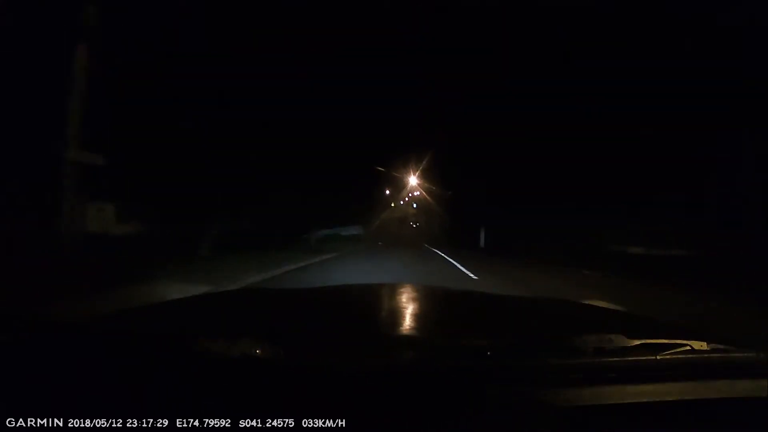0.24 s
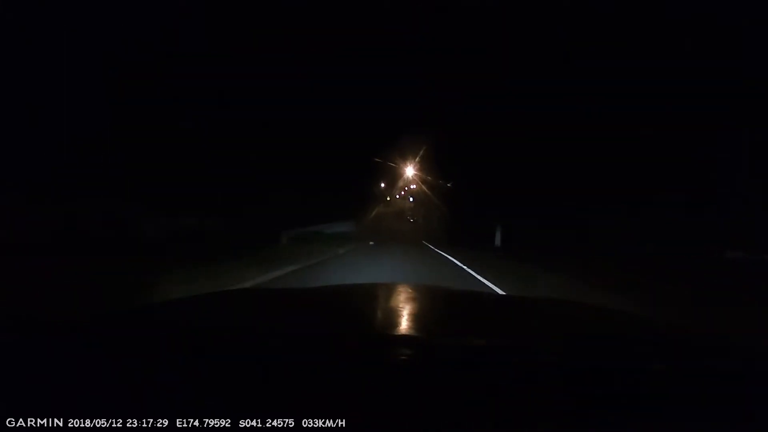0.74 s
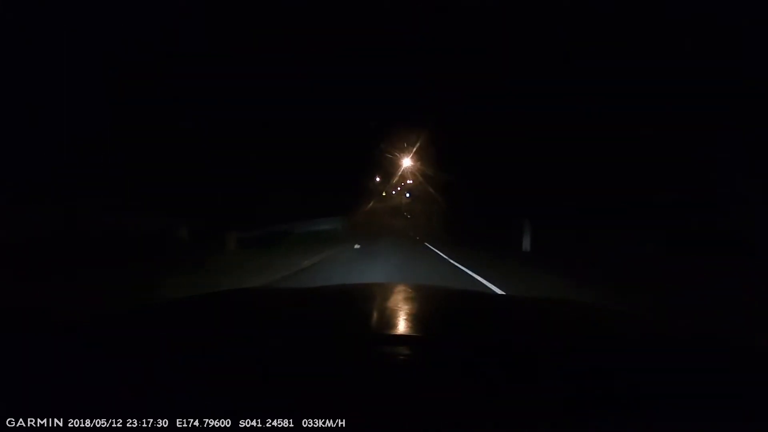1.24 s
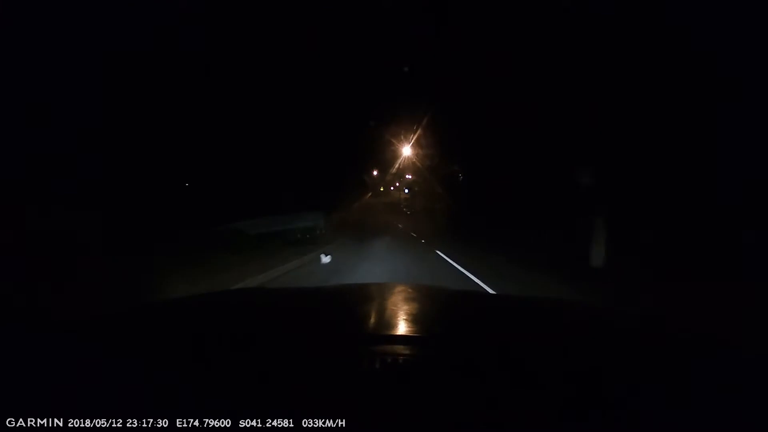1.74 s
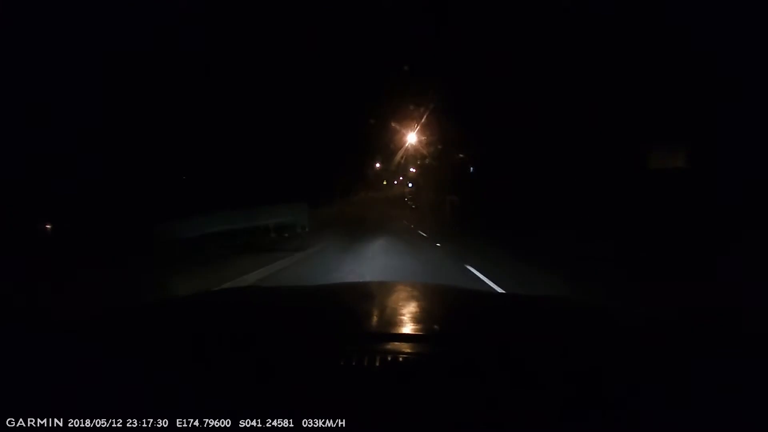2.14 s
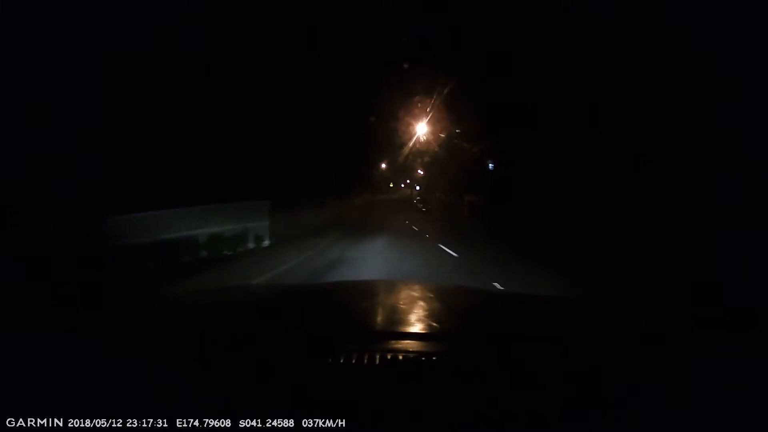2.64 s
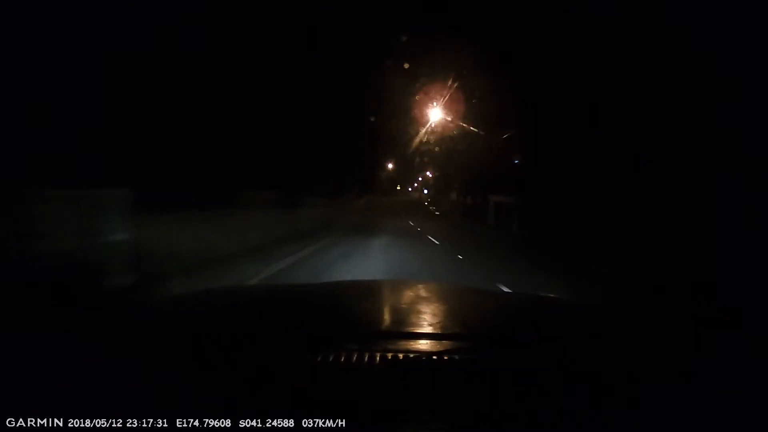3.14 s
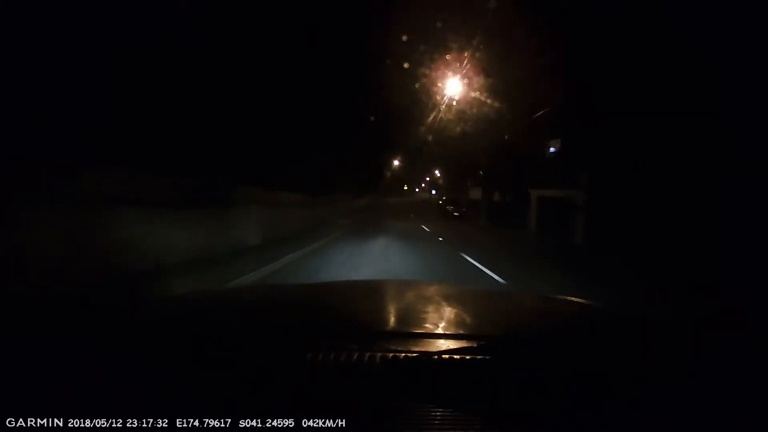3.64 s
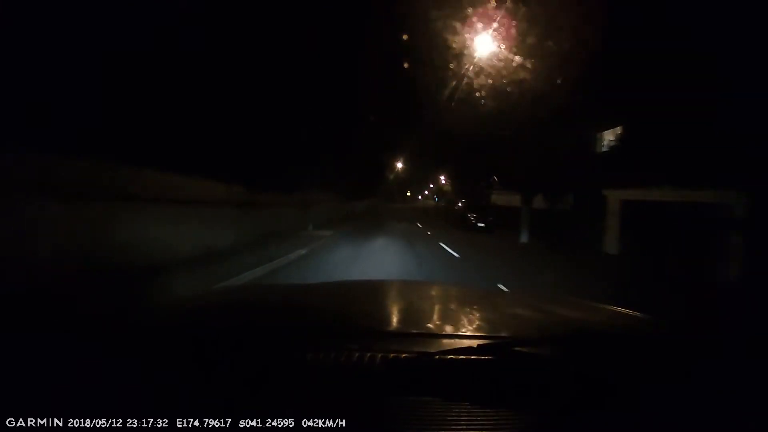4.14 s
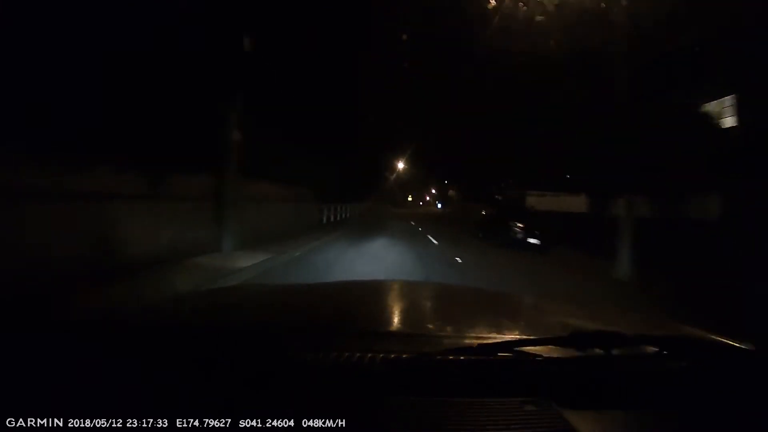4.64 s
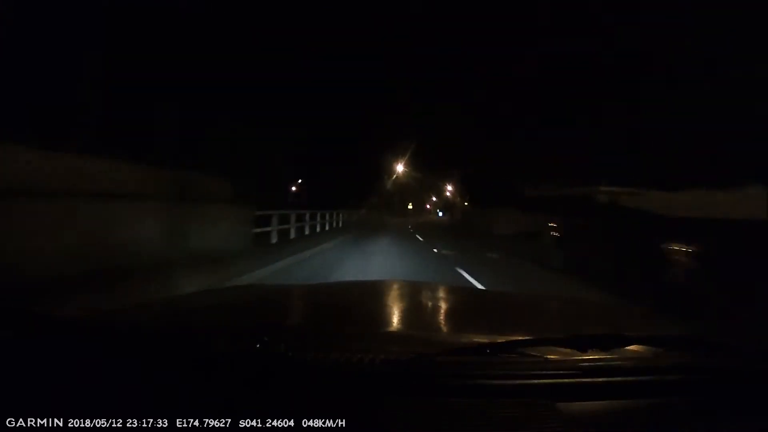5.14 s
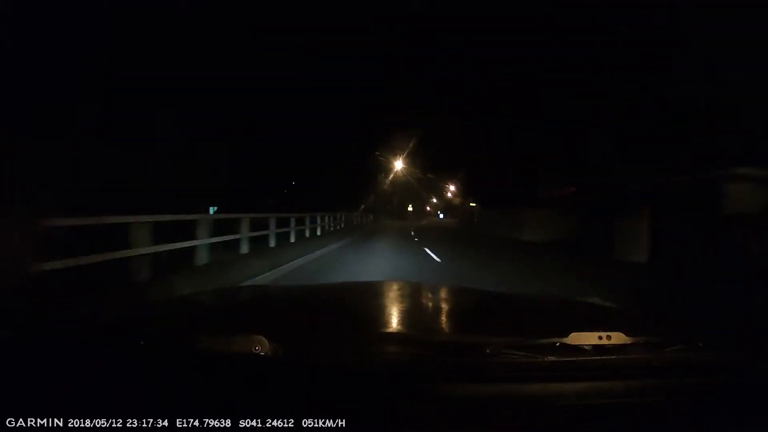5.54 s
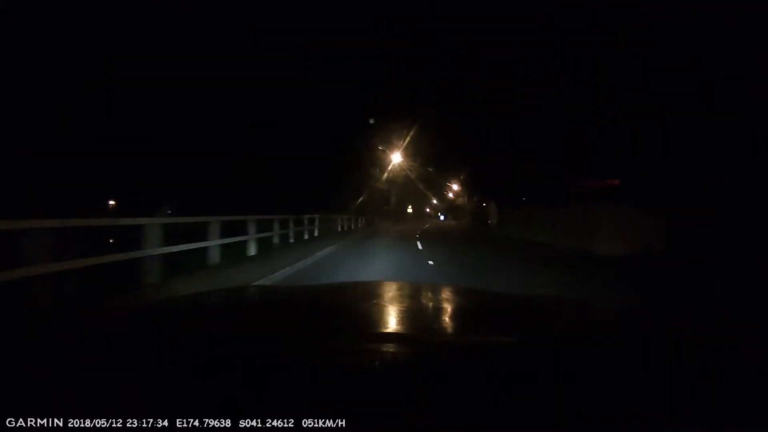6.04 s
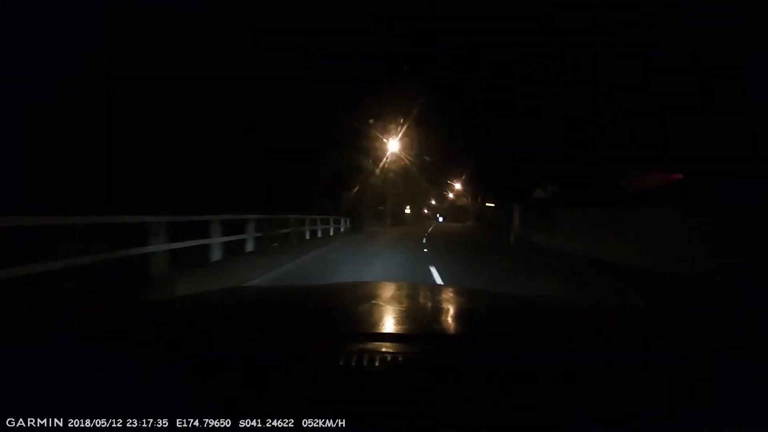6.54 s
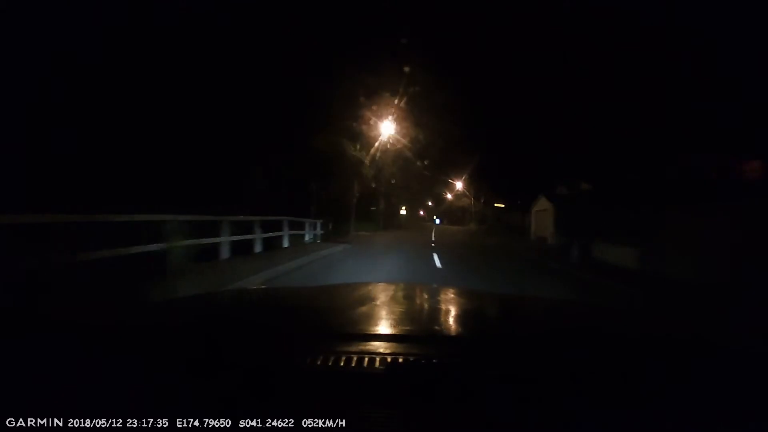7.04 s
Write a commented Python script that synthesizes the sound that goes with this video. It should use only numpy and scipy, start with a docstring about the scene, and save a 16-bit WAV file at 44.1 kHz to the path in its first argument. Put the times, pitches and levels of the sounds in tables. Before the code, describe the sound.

A car drives along a street, heard from the cabin: low booming rumble, humming engine, and occasional bumps, knocks and small plastic clicks.

```python
"""Inside a car at town speed: it pulls gently for four seconds, then the throttle eases and revs sink.
The road shakes the body and cabin air into a deep boom, tyres roar, the engine hums and its valves
tick faintly. Bumps thump, the suspension knocks, loose trim clicks, and air rushes past as speed builds.
A small windscreen microphone adds hiss and flattens the biggest swings."""
import sys
import numpy as np
from scipy import signal
from scipy.fft import rfft, irfft, next_fast_len
from scipy.io import wavfile
from scipy.ndimage import uniform_filter1d

SR = 44100
rng = np.random.default_rng(int(sys.argv[2]) if len(sys.argv) > 2 else 0)


def wav_record(signal):
    """Record a signal, one row per channel, as 16-bit PCM in the file named by sys.argv[1]."""
    frames = np.transpose(np.atleast_2d(signal))
    bounded = np.clip(frames, -1, 1)
    # unit amplitude maps onto the largest positive 16-bit level
    quanta = np.round(bounded * 32767).astype(np.int16)
    wavfile.write(sys.argv[1], SR, quanta)


N = 321489
TIME = np.arange(N) / SR

# unevenness of the road: t/s, relative boom level/dB
UNEVENNESS = [(0.05, -23), (0.25, -27.5), (0.42, -26.5), (0.53, -20), (0.61, -32.5), (.74, -21),
              (1.0, -21.5), (1.35, -24), (1.6, -26), (1.85, -22.5), (2.2, -14.5), (2.45, -20), (2.85, -16),
              (3.15, -19.5), (3.6, -17.5), (4.1, -14), (4.4, -19), (4.9, -16), (5.45, -20), (5.64, -19.5),
              (5.74, -24), (5.83, -21), (6.0, -20.5), (6.2, -18.5), (6.42, -18.5), (6.7, -14),
              (6.98, -19.5), (7.29, -19.5)]
# bumps in the road: crest t/s, relative surge level/dB, half length/s
ROAD_BUMPS = [(0.681, -11, 0.019), (0.834, -16.5, .03), (0.958, -13.5, 0.026), (1.671, -16, 0.03),
              (1.77, -21, 0.018), (2.091, -0.5, 0.026), (2.292, -13.5, 0.054), (2.51, -15, 0.034),
              (2.707, -15, 0.039), (3.279, 0.5, 0.025), (3.802, -4, 0.037), (3.964, -8.5, 0.034),
              (4.211, -7, 0.024), (4.522, -11, 0.033), (4.673, -14, 0.06), (5.07, -6, 0.041),
              (5.235, -8, 0.023), (5.642, -12.5, 0.025), (6.676, -9, 0.056), (6.821, -7, 0.054),
              (7.036, -4, 0.0075), (7.157, -7.5, 0.032)]
# deep modes of suspension, body and cabin air: f/Hz, width/Hz, gain/dB
DEEP_MODES = [(21.64, 10.5, -5.5), (32.1, 16.4, -11.5), (45.55, 13.1, 0.5), (66.1, 26.3, -14)]
def boom(gain_db=2.5, throb_db=1.8, swing_limit=.61):
    """The road shakes the car's deep modes; they throb as the wheels bounce and surge at each bump."""
    road_db, = curves(UNEVENNESS)
    rumble = steady(shaken(DEEP_MODES), span_s=0.1177)
    bed_power = undb(road_db + throb_db * walk(rate=24)) ** 2
    bump_power = sum((undb(db) * swell(s, half_s)) ** 2 for s, db, half_s in ROAD_BUMPS)
    low_end = rumble * undb(gain_db) * np.sqrt(bed_power + bump_power)
    # a soft limit holds back the boom's loudest swells
    swing = abs(signal.hilbert(low_end, next_fast_len(N))[:N])
    return low_end / (1 + (swing / swing_limit) ** 8) ** (1 / 8)


# coarse patches of asphalt: centre t/s, half length/s, boost/dB
COARSE_PATCHES = [(2.08, 0.068, 4), (2.405, 0.1, 3.5), (3.043, 0.21, 3), (3.537, 0.13, 8.5),
                  (3.96, 0.16, 9.5), (4.226, 0.092, 5.5), (7.05, 0.22, 1.5)]
# higher modes of the cabin air: f/Hz, width/Hz, gain/dB
CABIN_MODES = [(106, 40, -3.5), (130.8, 24, 2.5), (191.7, 28, -6), (246.9, 40.7, -3.5)]
def cabin_drone():
    """The road sets the cabin air droning, fuller with speed and over coarse asphalt."""
    coarse_db = sum(db * swell(s, half_s) for s, half_s, db in COARSE_PATCHES)
    drone = steady(shaken(CABIN_MODES), span_s=0.22)
    return drone * speed_gain(cruise_db=-31.5, db_per_km_h=0.08) * undb(coarse_db)


# air cavity of the loaded tyres: f/Hz, width/Hz, gain/dB
CAVITY_MODES = [(297.4, 29, -0.5), (326.8, 33.3, -2.5)]
def tyre_ring():
    """The road rings the air inside the tyres, louder with speed."""
    return steady(shaken(CAVITY_MODES), span_s=0.3) * speed_gain(cruise_db=-35.5, db_per_km_h=0.3)


# grain of the asphalt: t/s, relative roar level/dB
GRAIN = [(0.05, -46), (0.81, -44.3), (1.8, -44), (2.2, -42), (3.1, -40.4), (3.7, -38.5), (4.15, -39),
         (4.6, -41), (5.72, -43.5), (7.2, -43.5)]
# tyre roar through doors and glass: f/Hz, relative density/dB
ROAR_SPECTRUM = [(200, -5.5), (380, 9.5), (450, 8.5), (520, 3), (680, 1), (870, -2.5), (990, -6.5),
                 (1500, -12), (2100, -13.5), (3000, -18.5), (4500, -24), (8000, -29), (15000, -42)]
# ring of windows and door panels: f/Hz, width/Hz, level against the roar/dB
PANEL_RING = [(848, 64, -1), (1107, 44, -4), (1480, 84, 1), (1736, 52, -0.5), (1923, 65, -3),
              (2115, 87, 0.5)]
def tyre_roar(gain_db=1.34, waver_db=0.3):
    """The tread roars, wavering with the asphalt; windows and door panels pass it and ring with it."""
    grain_db, = curves(GRAIN)
    tread = coloured(ROAR_SPECTRUM)
    panels = sum(undb(db) * resonate(coloured(ROAR_SPECTRUM), hz, w) for hz, w, db in PANEL_RING)
    return level(tread + panels, gain_db) * undb(grain_db + waver_db * walk(rate=15))


# engine speed: t/s, four-stroke cycle rate/Hz
CYCLE_RATE = [(0, 14.495), (.4, 14.292), (.9, 14.859), (1.4, 14.924), (1.9, 15.323), (2.4, 15.899),
              (2.85, 16.543), (3.5, 17.036), (4.15, 17.272), (4.4, 16.991), (4.62, 15.619), (4.9, 14.917),
              (5.1, 13.81), (5.6, 12.765), (6.1, 12.481), (6.6, 12.097)]
# engine effort: t/s, gain/dB
EFFORT = [(0, 1.5), (2, 1.3), (4.4, 1.5), (5.3, -1.5), (7.29, -3)]
def engine():
    """Hum and valve ticks lock to the engine cycle and ride up and down with the load."""
    cycle_hz, = curves(CYCLE_RATE)
    load_db, = curves(EFFORT)
    cycles = np.cumsum(cycle_hz) / SR
    return undb(load_db) * (hum(cycles) + valves(cycles))


# partials of the firing hum: multiple of the cycle rate, level before load/dB
PARTIALS = [(3, -29), (4, -31.5), (6, -37), (9, -36), (13, -39.5)]
def hum(cycles, waver_db=3.5):
    """The firings hum on a few multiples of the cycle rate, each a little unsteady."""
    return sum(undb(db + waver_db * walk(rate=5.33)) * np.sin(2 * np.pi * (k * cycles + rng.random()))
               for k, db in PARTIALS)


# valve taps: place in the cycle/0-1, relative level/dB, f/Hz
VALVE_TAPS = [(.06, -7, 3700), (.21, -7, 1320), (.365, -6, 7200), (.575, -3, 6700), (.615, -6, 5250),
              (.655, -2, 2950), (.79, -8, 5250), (.955, 3.5, 6300), (.96, -5, 10500)]
# ring of engine block and valve gear: f/Hz, width/Hz, gain/dB
BLOCK_MODES = [(567, 22.7, 28.5), (760, 20, 19), (1270, 29, 12.5), (1332, 30, 19), (2575, 80, 7),
               (2954, 82, 8), (3590, 65, 5.5), (4095, 340, 4), (5264, 91, 4), (5660, 320, -3),
               (6280, 88, 3), (6660, 57, -1.5), (7240, 110, 1.5), (7850, 100, -4), (8500, 2000, -7),
               (10500, 760, -1), (12400, 1400, -9.5)]
def valves(cycles, tap_s=0.0067, scatter_db=1.0, whirr_db=-11, spread_oct=0.27, spill=0.14):
    """Unequal taps repeat each cycle over a steady whirr; each rings mostly the modes near its pitch."""
    taps = []
    for place, db, tap_hz in VALVE_TAPS:
        strikes = np.diff(np.floor(cycles - place), prepend=np.floor(cycles[0] - place))
        sizes = undb(db + scatter_db * rng.standard_normal(N))
        envelope = signal.lfilter([1], [1, -np.exp(-1 / (tap_s * SR))], strikes * sizes)
        taps.append((tap_hz, envelope))
    ring = 0
    for hz, w, db in BLOCK_MODES:
        force = undb(whirr_db)
        for tap_hz, envelope in taps:
            nearness = np.exp(-(np.log2(hz / tap_hz) / spread_oct) ** 2)
            force = force + envelope * (spill + nearness)
        ring = ring + undb(db) * resonate(force * rng.standard_normal(N), hz, w)
    return level(ring, db=-52)


# clicks of loose trim: t/s, peak/dB, crack gain/dB, pitch ratio
TRIM_HITS = [(.6738, -29.5, -5, .6), (.678, -35, -12, .8), (.69, -41, -13, .9), (1.3955, -39, -12, 1.28),
             (2.0265, -34.5, -15, 1.14), (2.032, -38, -19, 1.05), (2.038, -41, -19, 1.1),
             (2.0505, -33, -15, 1), (2.054, -35, -16, .97), (2.2642, -30.5, -22, .98),
             (2.2668, -31, -23, .98), (4.22, -39, -10, 1), (4.742, -40, -10, 1)]
# ring of the plastic: f/Hz, width/Hz, gain/dB
PLASTIC_MODES = [(1750, 1500, 0), (2600, 650, -3), (3100, 340, 5), (3540, 450, 3), (5450, 900, -9),
                 (6700, 2100, -9)]
def trim_clicks(decay_s=0.00076, crack_top_hz=12500):
    """Plastic parts of different sizes touch and bounce: a brief crack and a damped ring."""
    out = np.zeros(N)
    soften = signal.butter(2, crack_top_hz, fs=SR)
    for s, peak_db, crack_db, pitch in TRIM_HITS:
        contact = burst(s, decay_s)
        ring = sum(undb(db) * steep_band(contact, pitch * hz, w) for hz, w, db in PLASTIC_MODES)
        click = ring + undb(crack_db) * signal.lfilter(*soften, contact)
        out += undb(peak_db) * click / abs(click).max()
    return out


# suspension knocks: t/s, peak/dB, hardness as tilt/dB per octave
SUSPENSION_HITS = [(2.029, -25, -16), (2.088, -33, -4), (6.585, -30, -10), (6.866, -32, 5),
                   (6.873, -24.5, -9), (7.073, -35, 0)]
# hollow ring of the suspension: f/Hz, width/Hz, gain/dB
SUSPENSION_MODES = [(385, 92, 0), (824, 190, -6), (960, 200, -8)]
def knocks(decay_s=0.0064):
    """Sharp edges in the road knock the suspension; a harder edge brings out the upper, hollow ring."""
    out = np.zeros(N)
    lowest_hz = SUSPENSION_MODES[0][0]
    for s, peak_db, tilt_db in SUSPENSION_HITS:
        contact = burst(s, decay_s)
        knock = sum(undb(db + tilt_db * np.log2(hz / lowest_hz)) * steep_band(contact, hz, w)
                    for hz, w, db in SUSPENSION_MODES)
        out += undb(peak_db) * knock / abs(knock).max()
    return out


# swells of hiss: centre t/s, half length/s, f/Hz, width/Hz, crest level/dB
HISS_SWELLS = [(1.66, .25, 11200, 2600, -62), (3.8, .17, 3300, 300, -62)]
def sizzle():
    """Faint high hisses fade in and out."""
    return sum(level(steep_band(rng.standard_normal(N), hz, w), db) * swell(s, half_s)
               for s, half_s, hz, w, db in HISS_SWELLS)


def air_rush():
    """Air rushes round the windscreen, its level rising steeply with speed."""
    air = steep_band(rng.standard_normal(N), hz=1680, width=840)
    return level(air, db=0) * speed_gain(cruise_db=-59.5, db_per_km_h=1)


# the car's pace: t/s, speed/(km/h)
CAR_SPEED = [(0, 25.5), (1.4, 32.6), (2.6, 45.7), (4.2, 45.6), (5.3, 51.2), (7.29, 48.3)]
def speed_gain(cruise_db, db_per_km_h, cruise_km_h=50):
    """A fader that follows the car's speed."""
    km_h, = curves(CAR_SPEED)
    return undb(cruise_db + db_per_km_h * (km_h - cruise_km_h))


def undb(db):
    """Decibels to gain."""
    return 10 ** (np.asarray(db) / 20)


def level(x, db):
    """Set the rms level of x."""
    return x * undb(db) / np.sqrt(np.mean(x ** 2))


def curves(table):
    """The columns of a timed table, one value per sample."""
    s, *columns = np.transpose(table)
    return [np.interp(TIME, s, c) for c in columns]


def swell(s, half_s):
    """A bell-shaped fade that crests at time s."""
    return np.exp(-((TIME - s) / half_s) ** 2)


def resonate(x, hz, width):
    """Two-pole resonance with gain 1 at its centre."""
    return signal.lfilter(*signal.iirpeak(min(hz, .45 * SR), hz / width, fs=SR), x)


def steep_band(x, hz, width):
    """The same resonance twice, for steeper skirts."""
    return resonate(resonate(x, hz, width), hz, width)


def coloured(points):
    """Noise with a spectrum of (f/Hz, level/dB) points."""
    hz, db = np.transpose(points)
    log_hz = np.log(np.maximum(np.fft.rfftfreq(N, 1 / SR), 1))
    return irfft(rfft(rng.standard_normal(N)) * undb(np.interp(log_hz, np.log(hz), db)), N)


def walk(rate):
    """A smooth random wander with spread 1, at rate steps a second."""
    size = int(SR / rate)
    steps = np.repeat(rng.standard_normal(N // size + 1), size)
    wander = uniform_filter1d(uniform_filter1d(steps, size), size)[:N]
    return wander / wander.std()


def shaken(modes):
    """Steep-sided modes, each driven by its own random road roughness."""
    return sum(undb(db) * steep_band(rng.standard_normal(N), hz, w) for hz, w, db in modes)


def steady(x, span_s):
    """Even out swells slower than span_s; rms 1."""
    return x / np.sqrt(uniform_filter1d(x ** 2, int(span_s * SR)) + 1e-12)


def burst(s, decay_s):
    """A short rough contact that starts at time s."""
    return rng.standard_normal(N) * (TIME >= s) * np.exp(-np.minimum(abs(TIME - s) / decay_s, 40))


def scene():
    """Road, engine, rattles and air meet at the windscreen, in mono."""
    road = boom() + cabin_drone() + tyre_ring() + tyre_roar()
    return (road + engine() + trim_clicks() + knocks() + sizzle() + air_rush())[None]


# microphone hiss: f/Hz, relative density/dB
MIC_HISS = [(500, -7), (3000, 0.5), (6000, 6), (10000, 4), (13000, 5), (15700, 3.5)]
def record(dry, ceiling=.71, top_hz=15700):
    """The microphone hisses; its amplifier flattens the largest swings and cuts the top."""
    x = dry + level(coloured(MIC_HISS), db=-56)
    flattened = x / (1 + (x / ceiling) ** 12) ** (1 / 12)
    return signal.sosfilt(signal.ellip(12, .1, 80, top_hz, fs=SR, output="sos"), flattened)


dry = scene()
out = record(dry)
wav_record(out)
```